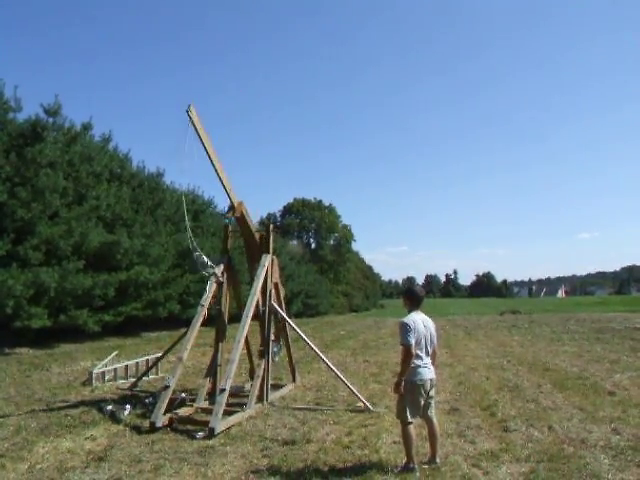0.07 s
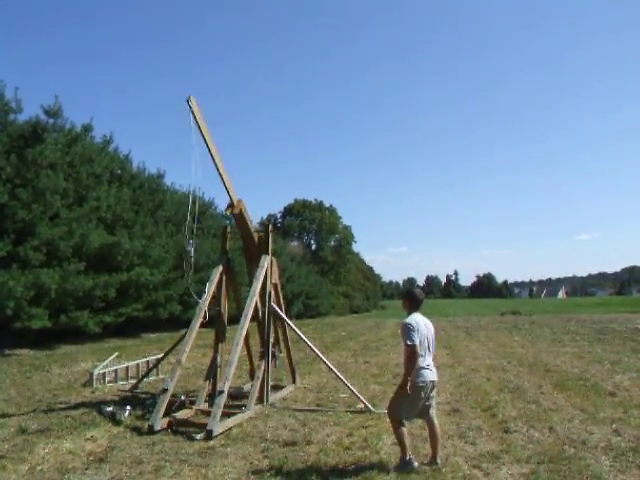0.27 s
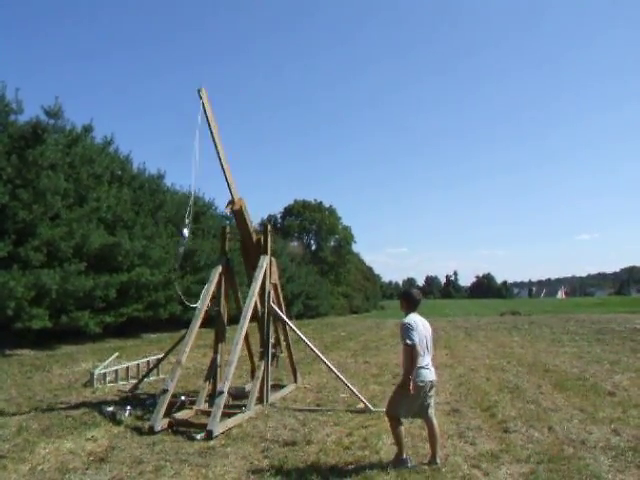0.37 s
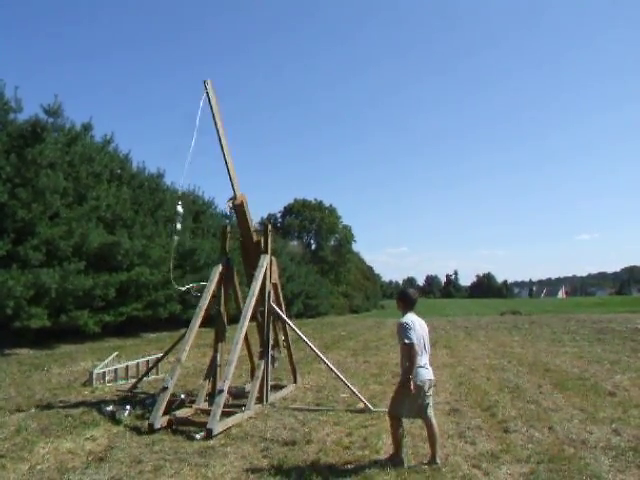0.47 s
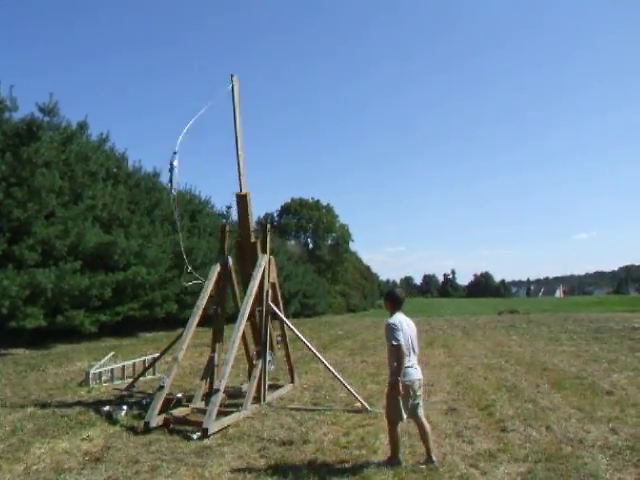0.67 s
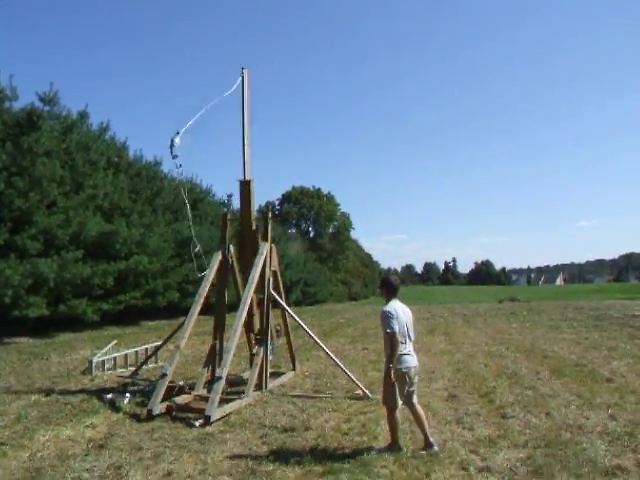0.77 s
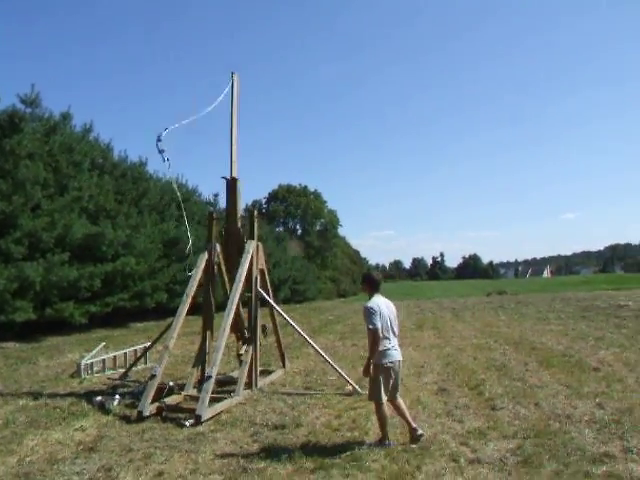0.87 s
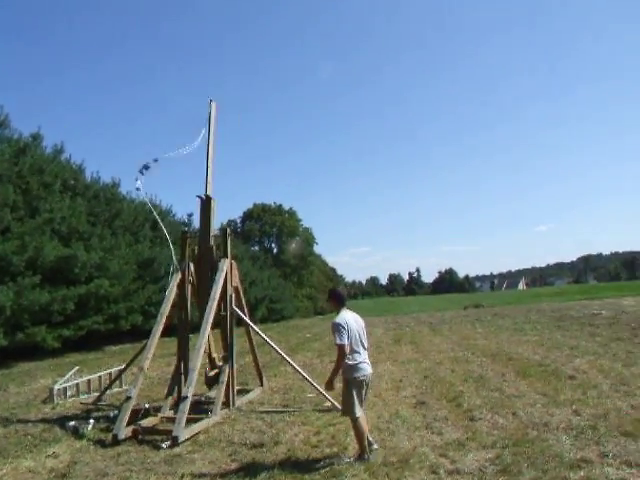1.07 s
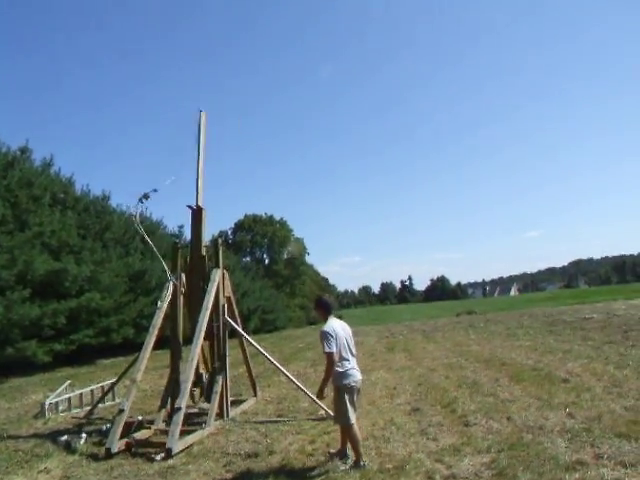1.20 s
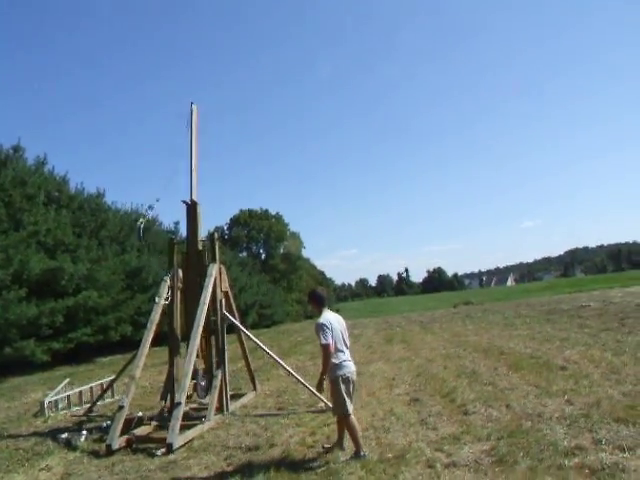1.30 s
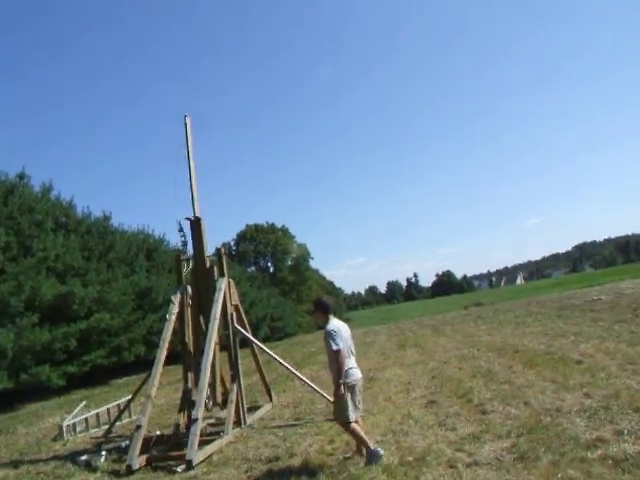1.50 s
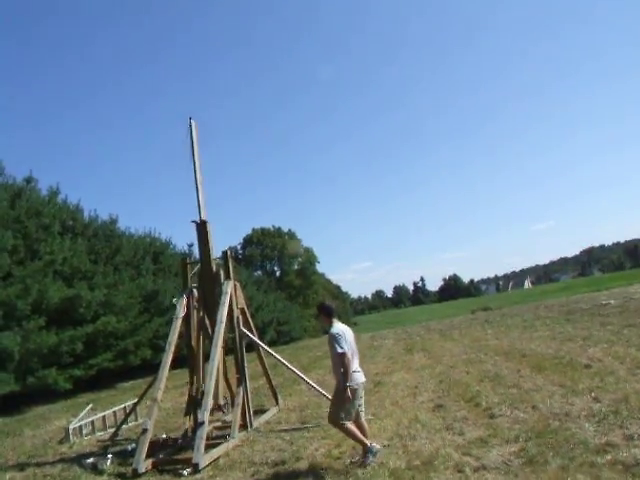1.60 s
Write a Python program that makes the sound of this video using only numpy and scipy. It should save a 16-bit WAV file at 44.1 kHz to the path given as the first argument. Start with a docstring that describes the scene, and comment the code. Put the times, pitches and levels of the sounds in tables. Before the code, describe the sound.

A wooden trebuchet swings, its timbers scraping and knocking, then settles with faint rubbing.

```python
"""A wooden trebuchet swings in an open field. Its timbers scrape in tiny slips and knock with damped
tones, and its fittings click and ring. The clatter thins out; a soft rubbing with a few weak taps and
two faint squeaks follows as the arm settles. All of it rings the frame and scatters in a short echo.
Wind nudges the microphone over a thin, steady hiss."""
import sys
import numpy as np
from scipy import signal
from scipy.fft import rfft, irfft
from scipy.io import wavfile

SR = 44100
rng = np.random.default_rng(int(sys.argv[2]) if len(sys.argv) > 2 else 0)


def transcribe(signal):
    """Save signal, clipped to [-1, 1], as a 16-bit WAV file at the path in sys.argv[1]."""
    frames = np.atleast_2d(signal).T
    limited = np.clip(frames, -1, 1)
    pcm = np.round(limited * 32767).astype(np.int16)
    wavfile.write(sys.argv[1], SR, pcm)


N = 72765
TIME_S, FREQ_HZ = np.arange(N) / SR, np.fft.rfftfreq(N, 1 / SR)


def amp(db):
    """Decibels to gain."""
    return 10 ** (np.asarray(db) / 20)


def unit_rms(x):
    """Scale to rms 1."""
    return x / np.sqrt(np.mean(x ** 2) + 1e-20)


def gain_curve(table, column=1):
    """Gain over time from one dB column; end values hold."""
    rows = np.array(table)
    return amp(np.interp(TIME_S, rows[:, 0], rows[:, column]))


def colour(x, spectrum):
    """Filter x by (f/Hz, level/dB) points; rms 1."""
    hz, db = np.transpose(spectrum)
    gain = amp(np.interp(np.log(FREQ_HZ + 1), np.log(hz), db))
    return unit_rms(irfft(rfft(x) * gain, N))


def noise(spectrum):
    """Coloured Gaussian noise; rms 1."""
    return colour(rng.standard_normal(N), spectrum)


def band_noise(hz, width_hz):
    """Noise in one resonance; rms 1."""
    detuning = 1.3 * (FREQ_HZ - hz) / width_hz  # 1.3: width taken at -3 dB
    return unit_rms(irfft(rfft(rng.standard_normal(N)) / (1 + detuning ** 2), N))


def envelope(start_s, rise_s, hold_s, t60_s):
    """Attack, hold, exponential release."""
    age_s = TIME_S - start_s
    attack = np.clip(age_s / rise_s, 0, 1) ** 1.2
    return attack * amp(-60 * np.maximum(age_s - rise_s - hold_s, 0) / t60_s)


def burst(x, shape):
    """Envelope x and scale it to the envelope's energy."""
    return unit_rms(x * shape) * np.sqrt(np.mean(shape ** 2))


def ring(x, modes):
    """Response of damped modes driven by x."""
    response = np.zeros(N)
    for hz, db, t60_s in modes:
        decay = amp(-60 * TIME_S / t60_s)
        response += 2 * amp(db) * decay / decay.sum() * np.cos(2 * np.pi * hz * TIME_S)
    return signal.fftconvolve(x, response)[:N]


def slips(rate_per_s=5000, spread_db=2.5):
    """Friction: dense, tiny impulses of uneven size."""
    size = amp(spread_db * np.minimum(rng.exponential(1, N), 4))
    return size * rng.choice([-1, 1], N) * (rng.random(N) < rate_per_s / SR)


# Hiss spectrum: f/Hz, level/dB
HISS_SPECTRUM = [(20, -5), (55, 0.5), (88, 8.5), (120, 1.5), (300, -5), (700, -2.5), (1500, -16.5),
                 (3000, -26.5), (5500, -9.5), (6700, -9), (7500, 3.5), (8200, -5), (9000, -33.5)]

def hiss(level_db=-45):
    """Thin, steady background noise."""
    return amp(level_db) * noise(HISS_SPECTRUM)


# Gust strength: t/s, level/dB
GUST_LEVELS = [(0, -54), (.87, -64), (.925, -40), (.99, -56.5), (1.29, -52), (1.36, -39.5), (1.42, -51.5),
               (1.49, -44), (1.54, -48), (1.595, -32), (1.63, -46.5)]
# Gust spectrum: f/Hz, level/dB
GUST_SPECTRUM = [(8, 2), (22, 2.5), (42, 4.5), (70, -14), (160, -15), (400, -36), (2000, -83)]

def wind():
    """Gusts on the microphone make a low rumble."""
    return burst(noise(GUST_SPECTRUM), gain_curve(GUST_LEVELS))


# Scraping in the swing: t/s, body level/dB, treble level/dB
SCRAPE_LEVELS = [(.21, -58, -63.5), (.24, -37, -39), (.256, -26.5, -31.5), (.295, -30.5, -32),
                 (.352, -28.5, -35), (.385, -32, -32.5), (.425, -30.5, -37.5), (.48, -38.5, -39),
                 (.53, -42.5, -46.5), (.57, -40, -39), (.62, -41, -44.5), (.65, -37.5, -39),
                 (.70, -40, -40.5), (.78, -47.5, -46), (.875, -52, -48), (.91, -54.5, -48.5),
                 (.97, -55, -56.5)]
# Wooden body and treble spectra: f/Hz, level/dB
BODY_SPECTRUM = [(60, -21), (170, -3), (340, 1.5), (650, 0), (900, 1.5), (1150, 3), (1550, -4), (2200, -9),
                 (3200, -27), (6000, -58.5)]
TREBLE_SPECTRUM = [(1200, -41.5), (2700, 0.5), (3200, -2), (3800, 4.5), (4700, -2.5), (5800, -9),
                   (6600, -3), (7200, 7), (8100, -4), (9000, -22.5)]

def scrape():
    """The same slips sound in the wooden body and as gritty treble."""
    friction = slips()
    body = colour(friction, BODY_SPECTRUM) * gain_curve(SCRAPE_LEVELS)
    treble = colour(friction, TREBLE_SPECTRUM) * gain_curve(SCRAPE_LEVELS, column=2)
    return body + treble


# Timber knocks: t/s, level/dB, f/Hz, rise/s, hold/s, t60/s, crack/dB re level, thud/dB re level
TIMBER_KNOCKS = [(0.216, -28.5, 768, 0.015, 0.0046, 0.033, -7.5, -8),
                 (0.249, -21, 457, 0.0026, 0.0014, 0.017, -12, -3.5),
                 (0.256, -25, 1175, .002, 0.0035, .02, -11, -1),
                 (0.277, -30, 1133, 0.0025, .005, .02, -6, -3),
                 (.3105, -9, 1088, 0.0026, 0.00045, .013, -15, -36),
                 (0.329, -30, 1290, 0.0012, 0.0027, 0.017, -3, -3.5),
                 (0.3358, -19.5, 1277, 0.0022, 0.0012, 0.0074, -2.5, -1),
                 (.340, -27.5, 346, .002, 0.0047, 0.03, -2.5, -21),
                 (.347, -27, 1344, 0.00075, 0.0016, 0.046, 3.5, -7.5),
                 (.3805, -18, 1203, 0.0021, .0032, 0.01, -5, -9.5),
                 (0.4024, -20, 1083, 0.00094, 0.0012, 0.029, -24, -4),
                 (0.418, -36, 1270, 0.0013, 0.0049, 0.025, -4, 2),
                 (0.464, -32, 1263, 0.0011, 0.0047, 0.067, -4, 0.5),
                 (0.544, -29, 1204, 0.00024, 0.0038, 0.044, 3, -6),
                 (0.5819, -27.5, 1070, 0.00076, 0.0094, 0.014, -6.5, -5.5),
                 (0.607, -33, 370, .001, 0.0027, 0.034, -12.5, 0),
                 (0.641, -29.5, 1200, 0.0018, 0.0029, 0.02, -10, -16),
                 (0.665, -37, 1080, 0.00071, 0.0086, 0.031, -2.5, 3),
                 (0.733, -38.5, 1330, 0.0013, 0.0038, 0.028, -4, -12.5),
                 (.753, -33, 900, 0.0014, 0.0037, 0.017, -18.5, -1.5),
                 (.772, -39, 262, 0.0017, 0.0024, 0.027, -2, -3),
                 (0.792, -41.5, 1000, 0.0013, 0.0024, .02, 2.5, 0),
                 (.813, -41.5, 360, 0.0018, 0.0022, 0.033, -3.5, -10),
                 (0.889, -37, 377, 0.0013, 0.002, 0.084, 1.5, 1),
                 (1.154, -36, 956, 0.0015, .002, 0.027, -14, -6.5),
                 (1.348, -40.5, 1510, 0.0011, 0.0065, 0.038, -7, -4.5)]
# Crack and thud spectra: f/Hz, level/dB
CRACK_SPECTRUM = [(300, -33.5), (900, -3), (1400, 5.5), (2100, 4.5), (2900, 1.5), (4000, -4.5), (5500, -23),
                  (9000, -31.5)]
THUD_SPECTRUM = [(60, -35), (180, -1.5), (330, -3.5), (520, -0.5), (850, 4), (1200, 5.5), (2000, -39),
                 (9000, -42)]

def knocks():
    """Struck timber: a heavily damped tone, a shorter splintery crack, a longer hollow thud."""
    out = np.zeros(N)
    for start_s, db, hz, rise_s, hold_s, t60_s, crack_db, thud_db in TIMBER_KNOCKS:
        sine = np.sqrt(2) * np.sin(2 * np.pi * hz * (TIME_S - start_s))
        tone = sine * envelope(start_s, rise_s, hold_s, t60_s)
        crack = burst(noise(CRACK_SPECTRUM), envelope(start_s, rise_s, hold_s, 0.77 * t60_s))
        thud = burst(noise(THUD_SPECTRUM), envelope(start_s, rise_s, hold_s, 2.06 * t60_s))
        out += amp(db) * (tone + amp(crack_db) * crack + amp(thud_db) * thud)
    return out


# Clicks of the fittings: t/s, level/dB, f/Hz, width/Hz, t60/s
FITTING_CLICKS = [(.248, -27.5, 3700, 900, 0.025), (0.2568, -22, 7730, 500, 0.023),
                  (0.281, -21, 3240, 1400, .025), (0.3, -20, 3870, 303, 0.031),
                  (0.301, -22, 7100, 990, 0.028), (.322, -42, 7300, 400, .05),
                  (0.353, -29.5, 6960, 1200, 0.057), (0.479, -20.5, 7060, 1650, 0.011),
                  (0.6367, -31, 7200, 1300, 0.018), (.667, -27, 6940, 248, 0.053),
                  (0.729, -33.5, 4300, 1000, 0.023), (0.743, -36.5, 3100, 900, 0.055),
                  (0.767, -31.5, 7050, 1100, 0.029), (0.768, -32.5, 4300, 1800, 0.037),
                  (0.806, -32.5, 4120, 700, 0.016), (0.815, -34, 5950, 2800, .012),
                  (0.849, -27.5, 5300, 3000, 0.0056), (.855, -36.5, 3280, 1800, 0.032),
                  (0.92, -39, 3180, 1600, 0.059), (1.1534, -34, 3260, 2420, 0.034),
                  (1.225, -42, 2900, 2420, 0.035), (1.349, -41, 4230, 250, 0.048),
                  (1.436, -33.5, 7300, 1000, 0.018), (1.456, -34.5, 3400, 1800, 0.048),
                  (1.4557, -35, 6200, 600, 0.025), (1.49, -29, 6270, 704, 0.049),
                  (1.493, -32, 3150, 2000, 0.055), (1.498, -37.5, 3720, 247, 0.04),
                  (1.537, -34, 3900, 1600, 0.019), (1.626, -48, 2800, 447, 0.11),
                  (1.630, -44, 4260, 700, 0.082)]
# Modes of the fittings: f/Hz, gain/dB, t60/s
FITTING_MODES = [(2780, 7.5, 0.071), (3700, 3.5, .09), (4240, 4, 0.075), (6920, 3, .1)]

def clicks(rise_s=0.00077, direct_db=-0.5):
    """Short, bright chatter sets the fittings ringing."""
    chatter = np.zeros(N)
    for start_s, db, hz, width_hz, t60_s in FITTING_CLICKS:
        chatter += amp(db) * burst(band_noise(hz, width_hz), envelope(start_s, rise_s, 0, t60_s))
    return amp(direct_db) * chatter + ring(chatter, FITTING_MODES)


# Rubbing strength: t/s, level/dB
RUB_LEVELS = [(.95, -51), (1.04, -49.5), (1.13, -46), (1.23, -42), (1.31, -43), (1.40, -43), (1.47, -41),
              (1.56, -45), (1.65, -48.5)]
# Rubbing spectrum: f/Hz, level/dB
RUB_SPECTRUM = [(100, -9), (350, -25), (580, 0.5), (750, -4.5), (1250, 1), (1600, -0.5), (1850, 4),
                (2400, -6.5), (2800, -2), (3400, -10.5), (4300, -11), (6000, -19.5), (9000, -21.5)]

def rub():
    """Soft friction swells as the arm settles."""
    return gain_curve(RUB_LEVELS) * colour(slips(), RUB_SPECTRUM)


# Squeaks in the rubbing: t/s, hold/s, level/dB
RUB_SQUEAKS = [(1.155, .06, -51.5), (1.348, 0.1, -50)]
# Pitch wobble spectrum: f/Hz, level/dB
WOBBLE_SPECTRUM = [(2, 0), (25, 1), (120, -40), (2000, -90)]

def squeaks(pitch_hz=1488, wobble_rms_hz=4.8, rise_s=0.012, t60_s=0.2):
    """The friction catches twice in a thin, wavering tone."""
    hz = pitch_hz + wobble_rms_hz * noise(WOBBLE_SPECTRUM)
    tone = unit_rms(np.sin(2 * np.pi * np.cumsum(hz) / SR))
    gain = sum(amp(db) * envelope(start_s, rise_s, hold_s, t60_s) for start_s, hold_s, db in RUB_SQUEAKS)
    return gain * tone


# Modes of the frame: f/Hz, gain/dB, t60/s
FRAME_MODES = [(267, -11, 0.32), (350, -18, 0.23), (501, -0.5, 0.13), (755, -13, .15), (1130, -24.5, 0.23),
               (1472, -3, 0.47), (1890, -5.5, 0.49)]

def frame_ring(machine):
    """Every contact rings the wooden frame."""
    return ring(machine, FRAME_MODES)


def echoes(x, level_db=-24, t60_s=0.2, rate_per_s=2000):
    """Weak, short scatter from the frame and the trees."""
    taps = rng.standard_normal(N) * (rng.random(N) < rate_per_s / SR)
    taps *= envelope(start_s=0.008, rise_s=0.004, hold_s=0, t60_s=t60_s)
    return amp(level_db) * signal.fftconvolve(x, taps / np.linalg.norm(taps))[:N]


def scene():
    """Mono mix: trebuchet, frame ring, echoes, hiss, wind."""
    machine = knocks() + clicks() + scrape() + squeaks() + rub()
    return (machine + frame_ring(machine) + echoes(machine) + hiss() + wind())[None]


def record(dry, cutoff_hz=8780):
    """Steep FIR low-pass."""
    lowpass = signal.firwin(161, cutoff_hz, window=("kaiser", 8), fs=SR)
    return signal.oaconvolve(dry, lowpass[None], "same")


dry = scene()
out = record(dry)
transcribe(out)
```